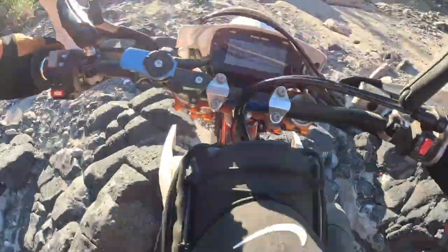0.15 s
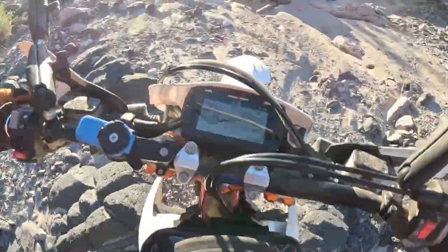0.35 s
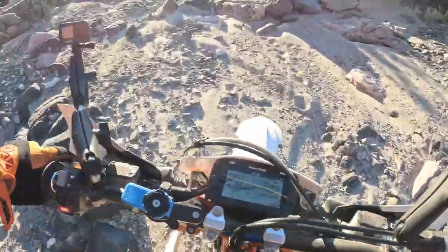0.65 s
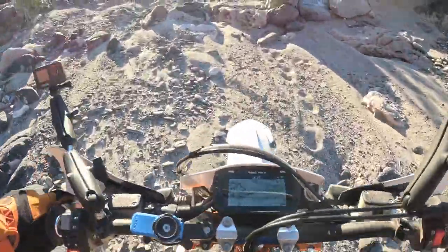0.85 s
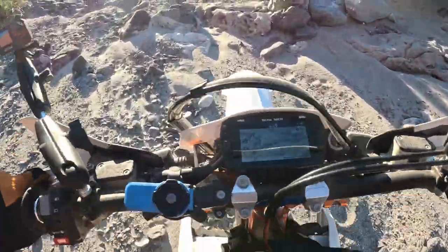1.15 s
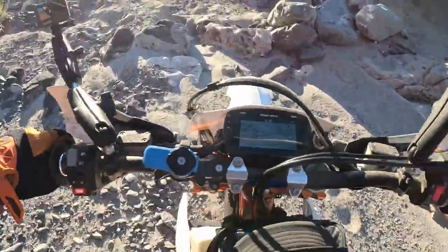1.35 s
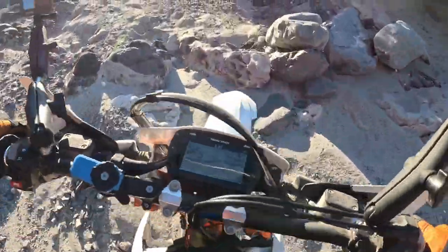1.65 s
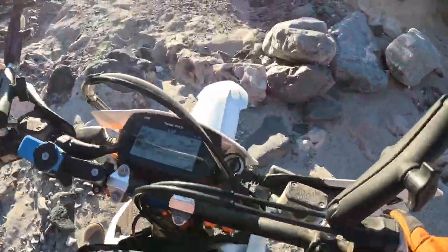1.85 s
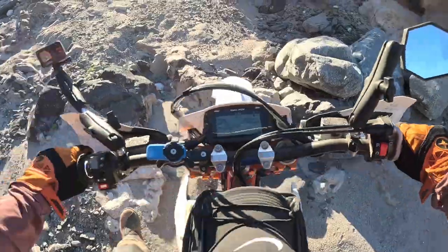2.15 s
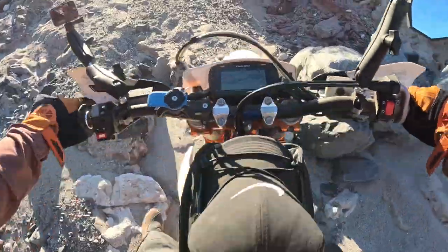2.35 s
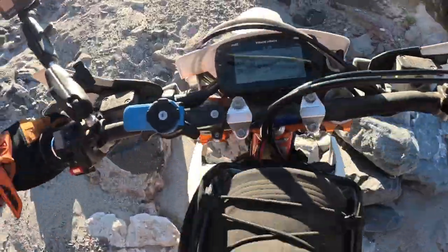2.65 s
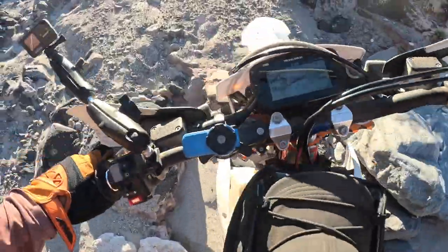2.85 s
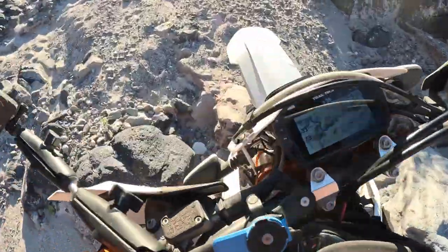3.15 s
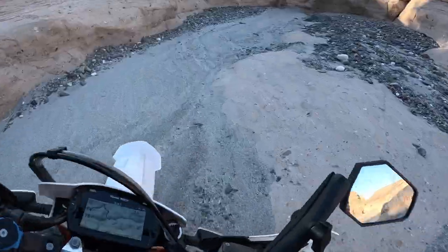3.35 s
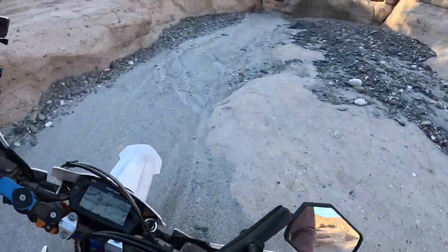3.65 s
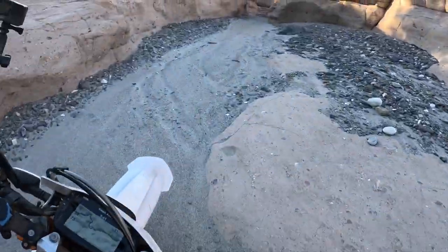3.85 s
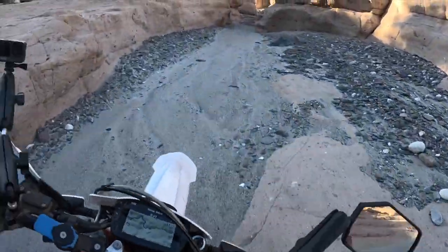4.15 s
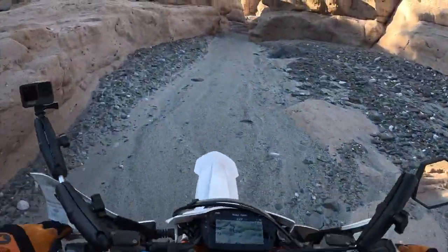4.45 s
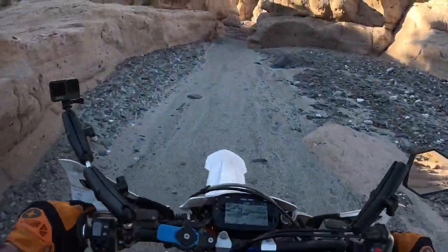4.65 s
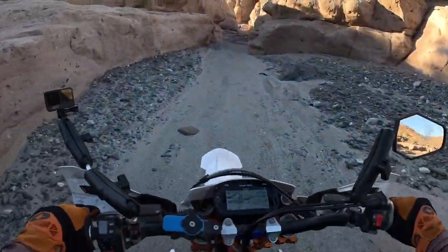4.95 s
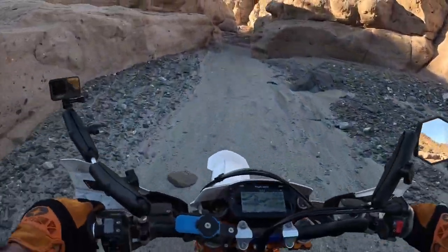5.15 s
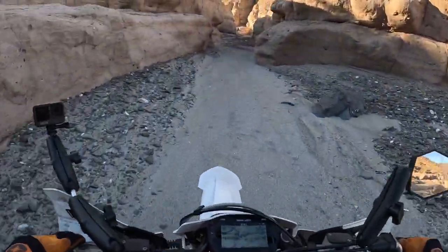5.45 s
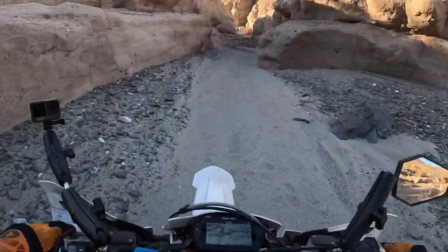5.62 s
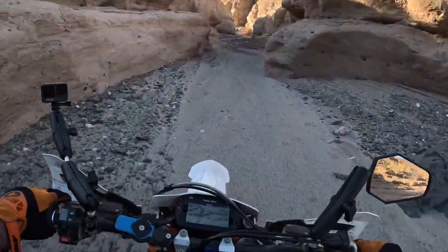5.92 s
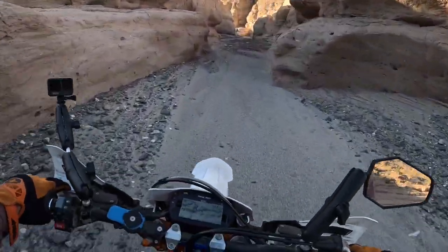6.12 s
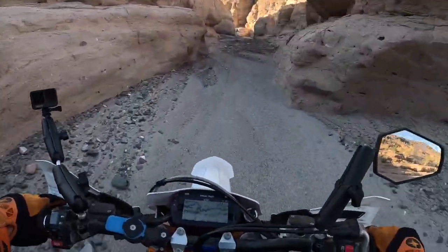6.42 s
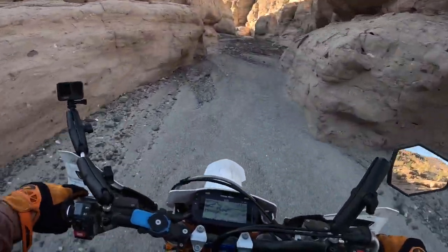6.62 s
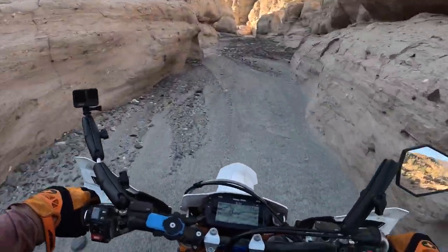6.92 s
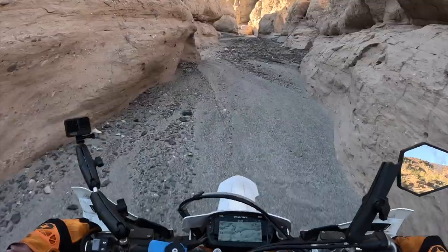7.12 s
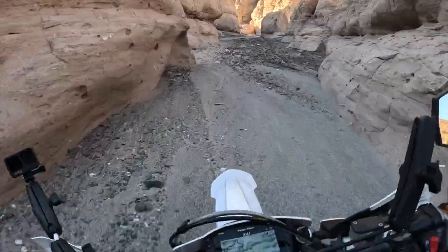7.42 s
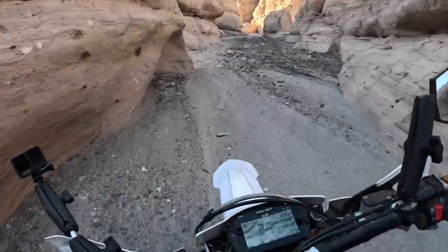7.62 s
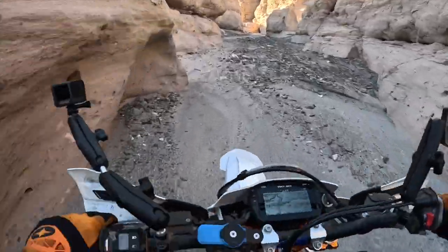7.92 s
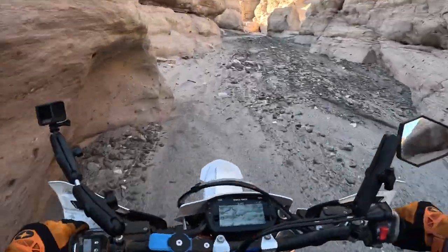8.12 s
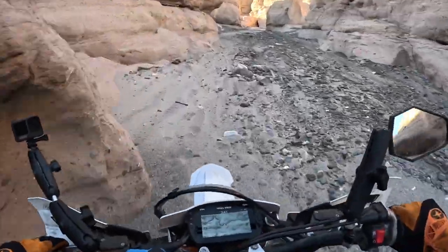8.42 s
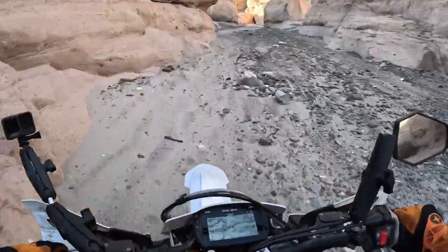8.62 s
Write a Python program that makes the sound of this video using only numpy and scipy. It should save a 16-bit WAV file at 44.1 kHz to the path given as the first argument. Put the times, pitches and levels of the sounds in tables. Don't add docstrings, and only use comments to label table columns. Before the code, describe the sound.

A single-cylinder trail bike chugs unevenly over rocks with chain slaps and stone clicks, then pulls harder and faster along a gravel canyon.

```python
import sys
import numpy as np
from scipy import signal
from scipy.fft import rfft, irfft, next_fast_len
from scipy.io import wavfile
from scipy.ndimage import uniform_filter1d

SR = 44100
rng = np.random.default_rng(int(sys.argv[2]) if len(sys.argv) > 2 else 0)


def how_loud(loudness_db):
    steps = np.asarray(loudness_db, float) / 20
    return 10 ** steps


def unload_audio(sound):
    columns = np.transpose(np.atleast_2d(sound))
    steps = np.round(np.clip(columns, -1, 1) * 32767)
    wavfile.write(sys.argv[1], SR, steps.astype(np.int16))


N = 387198
TIME_S = np.arange(N) / SR


def level(x, db=0):
    return x * how_loud(db) / np.sqrt(np.mean(x ** 2))


def noise():
    return rng.standard_normal(N)


def held(x, seconds):
    return uniform_filter1d(x, int(seconds * SR))


def curve(table, column=1, outside=None):
    columns = np.transpose(table)
    return np.interp(TIME_S, columns[0], columns[column], left=outside, right=outside)


def walk(rate):
    count = N // 50
    return np.interp(TIME_S * rate, np.arange(count), rng.standard_normal(count))


def shaped(x, gain, count=8):
    size = next_fast_len(N + SR)
    f = np.arange(size // 2 + 1) * SR / size + 1
    response = np.interp(f, f[::count], gain(f[::count]))
    return irfft(rfft(x, size) * response, size)[:N]


def modes(table):
    def response(f):
        total = 0
        for k, (hz, width_hz, db) in enumerate(table):
            detune = (f / hz - hz / f) * hz / width_hz
            total = total + (-1) ** k * how_loud(db) / (1 + 1j * detune)
        return total
    return response


def outline(table):
    hz, db = np.transpose(table)
    return lambda f: how_loud(np.interp(np.log(f), np.log(hz), db))


def strikes(turns, place, size):
    at = np.interp(np.arange(-1, 260) + place, turns, np.arange(N), -1, -1)
    keep = at >= 0
    whole = at[keep].astype(int)
    late = at[keep] - whole
    size = size[:len(at)][keep]
    out = np.zeros(N + 1)
    out[whole] = size * (1 - late)
    out[whole + 1] = size * late
    return out[:N]


def noise_bursts(starts, decay_s):
    return noise() * signal.lfilter([1], [1, -np.exp(-1 / (decay_s * SR))], starts)


# start_s, firing_rate_hz
ROCKS = [(0, 25.0), (.25, 24.9), (.4, 23.87), (.59, 21.92), (.79, 25.88), (.99, 17.17), (1.19, 16.43),
         (1.39, 14.61), (1.58, 13.79), (1.78, 13.85), (1.98, 12.63), (2.18, 17.35), (2.38, 24.87),
         (2.58, 27.13), (2.77, 17.05), (2.97, 14.71), (3.17, 10.34)]
# start_s, firing_rate_hz
CANYON = [(3.17, 26.88), (3.32, 29.48), (3.47, 29.42), (3.62, 33.52), (3.78, 32.99), (3.93, 32.16),
          (4.08, 33.74), (4.23, 34.79), (4.38, 28.7), (4.53, 25.0), (4.69, 27.4), (4.84, 26.83),
          (4.99, 29.35), (5.14, 29.54), (5.29, 31.12), (5.44, 32.63), (5.6, 34.55), (5.75, 34.14),
          (5.9, 31.92), (6.05, 29.38), (6.2, 28.72), (6.35, 29.47), (6.51, 29.27), (6.66, 28.97),
          (6.81, 30.43), (6.96, 25.94), (7.11, 24.29), (7.26, 26.38), (7.42, 31.1), (7.57, 34.56),
          (7.72, 32.07), (7.87, 29.43), (8.02, 29.16), (8.17, 26.41), (8.33, 22.78), (8.48, 26.38),
          (8.63, 25.82), (8.78, 25.69)]


def speed():
    flywheel_s, join_s = .08, .015
    join = int(CANYON[0][0] * SR)
    rocks = held(held(curve(ROCKS)[:join], flywheel_s), flywheel_s)
    canyon = held(held(curve(CANYON)[join:], flywheel_s), flywheel_s)
    return held(np.concatenate([rocks, canyon]), join_s)


# open_s, shut_s, opening_level_db, closing_level_db
TWISTS = [(0, 0.338, -20.5, -21), (0.354, 0.6, -28.5, -25.5), (0.602, 0.843, -22.5, -18.5),
          (1.07, 1.18, -26.5, -32), (1.224, 1.438, -20.5, -27.5), (1.524, 2.024, -27.5, -27.5),
          (2.059, 2.149, -15, -14.5), (2.278, 2.537, -23.5, -11.5), (2.547, 2.688, -12.5, -28.5),
          (2.827, 3.043, -27, -24), (3.13, 3.224, -40, -23), (3.235, 4.438, -13, -14.5),
          (4.435, 4.666, -19, -15), (4.659, 5.7, -15, -12.5), (5.704, 6.001, -12.5, -17),
          (6.004, 6.834, -16, -16), (6.905, 6.973, -37, -22), (7.08, 7.311, -32, -15),
          (7.329, 7.898, -10.5, -17), (7.905, 8.084, -17.5, -15.5), (8.082, 8.153, -29, -36),
          (8.283, 8.543, -29.5, -19), (8.576, 8.76, -21, -20)]


def throttle():
    shut_db, wrist_s = -33, .048
    opened = np.zeros(N)
    for open_s, shut_s, first_db, last_db in TWISTS:
        twist = how_loud(np.interp(TIME_S, [open_s, shut_s], [first_db, last_db]))
        opened += (TIME_S >= open_s) * (TIME_S < shut_s) * twist
    return 20 * np.log10(np.maximum(held(opened, wrist_s), how_loud(shut_db)))


# start_s, turbulence_db, upper_ring_db, low_thump_db, crank_shaking_db
SHELTER = [(0, 2.5, -3, -8, 0.8), (.5, 0.5, 12, -12, -3.5), (.9, 0, -2, -5, .1), (1.2, 1, -2, 9.5, 0.5),
           (2.051, 2, -1, 9, 2), (2.25, 10, 8, -5.5, 2), (2.6, 3, 6.5, -7, 2.5), (2.9, -2, -6, 0, 0.5),
           (3.2, 0.5, 5, -2, -1.5), (3.7, 6, -0.5, -9, 3), (4.2, 1.5, 1.5, -10, 3.5),
           (4.5, 4, -4, -14.5, -1.5), (5.0, -1, -4, -23, 2.5), (5.6, -3.5, -3, -11.5, .1),
           (6.2, 0.5, 1, -11.5, -1), (6.8, 0, -4, -15, -4), (7.05, 3.5, 1, -10, -1.5),
           (7.3, 7.5, -7, -12, 0), (7.5, 1, -2, -18, -4), (8.1, -1, 2, -16.5, -2.5),
           (8.4, 1, -2, -15.5, -1.5), (8.78, 1.5, -9, -4.5, 5)]


def shelter(column):
    return how_loud(curve(SHELTER, column))


# after_firing_mark_ms, pitch_hz, swell_ms, choke_ms, level_db, sign (ratio)
AIRBOX = [
    (0.88, 274, 6.4, 3.46, 1, 1),
    (-12.5, 302, 2.5, 5.4, -16, 0.9),
    (13.5, 245, 3, 4.25, -15.5, 1),
    (-4.5, 555, 4.7, 5.3, -17, 0.88),
    (-1, 352.6, 17, 17, -23, 0.93),
    (-2.5, 446, 7.8, 5.3, -23.5, 0.88),
    (-3, 206.8, 8.8, 4.7, -16.5, 0.87),
    (-5.5, 609, 3.3, 4.4, -22, 0.96),
]
# start_s, low_ring_db, middle_ring_db, high_rings_db, after_ring_db
LEAN = [(0, 0, 0, 2.5, -14), (.9, -8, -3, 3.5, 0.1), (2.1, 2, 1, 5, 0.5), (2.5, 3, 7, 3, -9),
        (3.2, -3, -3, 2, 8.5), (3.55, 5, 0.5, 0, -10), (3.75, -10, -4, 3.5, -2.5), (4.25, -4, -6.5, 2.5, 4),
        (4.6, 7, 1, 2, 7), (5.0, 8.5, 4.5, 1.5, -3.5), (5.3, 0.5, 1.5, -2, 3), (5.7, 0, -2.5, 2, 11),
        (6.0, 7, 3, 2, -4), (6.5, 1.5, 4, 2.5, 9), (6.85, 3, 5, 3, 6), (7.35, -2.5, -8, 4.5, -13),
        (7.8, 2, 1, -12, 0.5), (8.4, -10, -2, 4, 11)]
LEAN_RINGS = [
    [6],
    [5],
    [3, 7],
    [2],
]


def airbox(turns, hz, db):
    ms = np.arange(-1800, 1801) * 1000 / SR
    rings = []
    for at_ms, pitch_hz, swell_ms, choke_ms, ring_db, sign in AIRBOX:
        past = ms - at_ms
        swell = np.exp(-.5 * (past / np.where(past < 0, swell_ms, choke_ms)) ** 2)
        rings.append(sign * how_loud(ring_db) * np.cos(2 * np.pi * pitch_hz * past / 1000) * swell)
    beats = strikes(turns, 0, how_loud(.35 * rng.standard_normal(300)))
    beats = beats * how_loud(db) * np.sqrt(SR / hz / np.sum(sum(rings) ** 2))
    gulps = signal.fftconvolve(beats, sum(rings), "same")
    pull = how_loud(.35 * np.clip(np.gradient(hz) * SR, -20, 14) + 1.5 * walk(5))
    gulps += signal.fftconvolve(beats * (pull - 1), rings[2], "same")
    for column, which in enumerate(LEAN_RINGS, 1):
        change = how_loud(curve(LEAN, column)) - 1
        gulps += signal.oaconvolve(beats * change, sum(rings[k] for k in which), "same")
    gulps += signal.oaconvolve(beats * (shelter(2) - 1), rings[4], "same")
    column_modes = modes([(207.0, 168, -.82), (308.0, 126.0, 1.8)])
    rough = level(shaped(noise(), lambda f: column_modes(f) ** 2), -32)
    stroke_turns, stroke_width, stroke_db, stroke_hz = .2, .16, 9, 9.3
    before = (turns + stroke_turns + .5) % 1 - .5
    stroke = how_loud(stroke_db) * (stroke_hz / hz) ** 2 * np.exp(-.5 * (before / stroke_width) ** 2)
    stroke += np.minimum(hz / 25, 1)
    return gulps + rough * stroke * shelter(1) * how_loud(-.15 * (db + 25) + 3 * walk(20))


# pitch_hz, width_hz, level_db
EXHAUST = [
    (57.4, 50, -26),
    (114.6, 12, 9),
    (153, 35, 1.5),
]
CRANK_DB = [
    -10.5,
    -16.5,
    -2.5,
    -15.5,
    -16,
]


def exhaust(turns, hz):
    firings = strikes(turns, .639, how_loud(.4 * rng.standard_normal(300)))
    thump = shaped(firings, lambda f: modes([(82, 45, 0)])(f) ** 2)
    thump = level(thump, -10.5) * shelter(3)
    thud = shaped(firings, lambda f: modes(EXHAUST)(f) / (1 + (f / 260) ** 4))
    shake = np.zeros(N)
    for k, db in enumerate(CRANK_DB, 2):
        shake += how_loud(db + .8 * walk(7)) * np.sin(2 * np.pi * k * turns + k)
    shake *= (hz / 29) ** 2 * shelter(4)
    rumble = shaped(noise(), lambda f: modes(EXHAUST)(f) / (1 + (f / 220) ** 4))
    return level(level(thud) + shake + level(rumble, -14) + thump)


# place (cycle 0-1), rise (cycles), fall (cycles), level_db over the steady rattle
KNOCKS = [
    (.33, .015, .06, -1),
    (.44, .025, .1, 3),
    (.58, .02, .05, -2),
    (.8, .02, .05, -2),
    (.07, .015, .03, -5),
]


def knocking(turns, hz, scatter_db, depth_db=0.):
    out = np.ones(N)
    for place, rise, fall, db in KNOCKS:
        cycle = np.floor(turns - place + .5)
        past = turns - place - cycle
        size = how_loud(db + depth_db + scatter_db * rng.standard_normal(300))[cycle.astype(int)]
        knock = np.exp(-.5 * (past / np.where(past < 0, rise, fall)) ** 2)
        out += size * (25 / hz) ** .57 * knock
    return out


# pitch_hz, width_hz, level_db
CASES = [(425, 55, -6), (544.8, 33.7, 2.5), (674, 58, -1.5), (742, 62, -1), (873, 119, -2.5)]


def cases(turns, hz):
    drive = noise() * knocking(turns, hz, 3.0, -2)
    return level(shaped(drive, lambda f: modes(CASES)(f) / (1 + (400 / f) ** 10) / (1 + (f / 930) ** 12)))


# pitch_hz, density_db (dB per Hz)
METAL = [(590, -44.5), (1000, -11), (1190, -7.5), (2040, -10), (2310, -7.5), (3500, -14.5), (4510, -15),
         (5180, -15.5), (8000, -25.5), (10400, -37), (17600, -120)]
# pitch_hz, level_db
TOP = [(8000, 4.5), (8700, -3.5), (9050, -8.5), (9600, -0.5), (11300, -6.5), (12300, -15.5), (15200, -23.5)]
# pitch_hz, width_hz, level_db
COVERS = [(1270, 80, -5), (1540, 100, -5), (1790, 130, -4), (2090, 110, -3), (2570, 80, -3),
          (2980, 120, -6), (3450, 200, -7), (4100, 400, -11)]


def clatter(turns, hz):
    metal, top = outline(METAL), outline(TOP)
    bright = lambda f: metal(np.minimum(f, 8000)) * top(f)
    broad = noise() * knocking(turns, hz, 3.0, -14) * how_loud(1.2 * walk(12))
    broad = shaped(broad, lambda f: bright(f) / (1 + (950 / f) ** 8) / (1 + (f / 10500) ** 3))
    taps = np.zeros(N)
    for place, _, _, db in KNOCKS:
        taps += strikes(turns + .0052 * walk(30), place, how_loud(db + 7.5 * rng.standard_normal(300)))
    covers = level(noise() * knocking(turns, hz, .8, .3)) + level(taps, -11)
    covers = shaped(covers, lambda f: modes(COVERS)(f) / (1 + (f / 4500) ** 6) / (1 + (1100 / f) ** 8))
    flicks = (rng.random(N) < 300 / SR) * how_loud(3.0 * noise())
    flicks *= (25 / hz) ** 1.5 * knocking(turns, hz, 4.0, -5)
    flicks *= how_loud(-9 * ((TIME_S > 3.17) & (TIME_S < 6.6)))
    grit = shaped(noise_bursts(flicks, .0014), lambda f: bright(f) / (1 + (4200 / f) ** 4))
    seat = strikes(turns, 0, how_loud(2 * rng.standard_normal(300))) * ((TIME_S > 1.2) & (TIME_S < 3.14))
    shield = shaped(noise_bursts(seat, .009), lambda f: bright(f) / (1 + (7000 / f) ** 6))
    return level(level(broad) + level(covers, -.8) + level(grit, -24) + level(shield, -28))


# order (contacts per cycle), level_db
GEAR_ORDERS = [(63.2, 6), (60.2, 3), (57.5, -5), (66.5, -3), (88.5, -5), (106, -6)]
# place (cycle 0-1), speed_change (share of mean), load_db
SURGE = [
    (0, -.005, -1),
    (.2, -.03, -3),
    (.36, -.07, -2),
    (.42, -.05, 2),
    (.52, .02, 2.5),
    (.62, .05, 1),
    (.78, .03, -1.5),
    (1, -.005, -1),
]
# start_s, level_db
CLUTCH = [(0, 4.5), (.33, 5.5), (.42, 3), (.9, 1), (2.1, 0), (2.3, 2), (2.7, 2.5), (3.6, -7), (4.1, 1),
          (4.58, -4), (4.8, -8.5), (5.1, -6), (5.3, -2), (5.9, 0), (6.1, -4.5), (6.8, 4.5), (6.95, -19),
          (7.15, -1), (7.28, 2.5), (7.9, 4), (8.2, -25), (8.5, 7)]


def gears(turns, hz):
    place, speed_share, load_db = np.transpose(SURGE)
    swing = np.interp(turns % 1, place, speed_share) * (25 / hz) ** .9
    crank = np.cumsum(hz * (1 + swing + .004 * walk(3))) / SR
    teeth = np.zeros(N)
    for order, db in GEAR_ORDERS:
        teeth += how_loud(db + 2.5 * walk(120)) * np.sin(2 * np.pi * (order * crank + .1 * walk(200)))
    load = how_loud(np.interp(turns % 1, place, load_db) + 1.5 * walk(25))
    radiate = lambda f: (1.2 + 1.2 * np.abs(modes(COVERS)(f))) / (1 + (1150 / f) ** 8)
    return shaped(level(teeth * load), radiate) * how_loud(curve(CLUTCH))


def strained_part(turns, hz, notes, strength, low_hz):
    drive = noise() * knocking(turns, hz, 2.0, -3)
    ring = shaped(drive, lambda f: modes(notes)(f) / (1 + (low_hz / f) ** 10) / (1 + (f / 3800) ** 10))
    return level(ring) * how_loud(curve(strength, outside=-90))


# pitch_hz, width_hz, level_db
SINGING = [
    (2085, 26, 0),
    (3430, 110, -8),
    (2930, 90, -11),
]
# start_s, level_db
SING = [(3.5, -55), (3.85, -41), (4.2, -43), (4.35, -54), (4.55, -43), (4.9, -45), (5.12, -43), (5.2, -36),
        (5.36, -36), (5.5, -38), (5.9, -38), (6.1, -45), (6.8, -52)]


def clutch_cover(turns, hz):
    return strained_part(turns, hz, SINGING, SING, 1500)


# pitch_hz, width_hz, level_db
LOW_SINGING = [(1526, 60, -1.5), (1270, 70, -8), (1780, 70, -6.5), (2560, 70, -7), (2980, 90, -8.5),
               (3410, 120, -8.5)]
# start_s, level_db
LOW_SING = [(0, -38), (.33, -35), (.42, -44), (.58, -48), (.66, -41), (.85, -46), (1.0, -57), (2.12, -52),
            (2.24, -34), (2.45, -37), (2.68, -43), (2.8, -55)]


def low_covers(turns, hz):
    return strained_part(turns, hz, LOW_SINGING, LOW_SING, 1150)


# start_s, level_db
TANK_SHAKE = [(.4, -52), (.6, -38.5), (1.3, -39.5), (1.9, -40), (2.3, -36), (2.7, -52), (6.9, -50),
              (7.1, -36), (7.3, -31.5), (7.55, -38), (7.7, -45), (8.05, -38), (8.2, -50), (8.42, -33),
              (8.6, -45)]


def tank(turns, hz):
    return strained_part(turns, hz, [(540, 22, 0)], TANK_SHAKE, 450)


# start_s, level_db
GUARD_SHAKE = [(4.6, -50), (5.2, -43), (6.2, -43), (6.8, -39), (6.95, -36), (7.25, -36), (7.4, -51),
               (7.9, -40), (8.2, -38.5), (8.48, -33), (8.65, -35), (8.78, -40)]


def guard(turns, hz):
    return strained_part(turns, hz, [(805, 45, 0), (693, 40, -5.5)], GUARD_SHAKE, 600)


# start_s, peak_db, pitch_hz, ringing_share (0-1)
STONES = [(1.233, -19, 2570, 0.44), (1.4112, -18, 2650, 0.45), (1.471, -32, 2650, 0.6),
          (1.847, -10, 2530, 0.34), (2.0359, -15, 2590, 0.78), (2.096, -22, 2870, 0.5),
          (2.315, -20.5, 2480, 0.5), (3.0594, -33, 2580, 0.2), (4.563, -19.5, 3500, 0.5),
          (5.3, -29, 3020, 0.45), (5.5763, -30, 2880, 0.4), (7.3885, -13, 3710, 0.56),
          (3.6737, -18.5, 4850, 0.61), (0.0422, -21, 3260, 0.27), (0.3896, -26, 2600, 0.43),
               (0.436, -20, 2700, 0.54), (.7577, -25, 3000, .3), (0.78, -20, 3280, .3),
               (2.2687, -21, 4160, .4), (7.1292, -22, 4500, .3), (7.3498, -13, 2040, 0.63),
               (7.4233, -25, 3400, .4), (7.511, -25, 2320, .4), (1.2107, -24, 2640, .4)]
# start_s, peak_db, pitch_hz, ringing_share (0-1)
RINGING_STONES = [(0.478, -17, 1990, 1), (0.6257, -15, 2220, 1), (0.6696, -17, 1920, 1), (0.7943, -19, 2590, 0.9),
                  (0.871, -19, 2090, 0.9), (1.0577, -21, 1310, 0.9), (1.1794, -20, 1510, 0.9),
                  (1.2338, -16, 1690, 0.9), (1.3765, -18, 2260, 1), (1.5142, -18, 1870, 0.9),
                  (1.8464, -18, 2720, 0.9), (2.028, -16, 2540, 0.9), (2.0959, -19, 2730, 0.8),
                  (2.1492, -21, 1790, 0.9), (2.2151, -20, 1760, 0.9), (2.3383, -16, 1460, 0.8),
                  (2.394, -18, 1540, 0.9), (2.4355, -18, 1620, 0.9), (2.477, -16, 1670, 0.8),
                  (2.5128, -16, 1820, 0.9), (2.5543, -19, 1800, 0.9), (2.5905, -19, 1670, 0.9),
                  (3.1106, -21, 1740, 0.9), (3.1824, -19.5, 1900, 0.9)]
# start_s, peak_db, pitch_hz, ringing_share (0-1)
CANYON_STONES = [
    (4.52, -23, 2150, 0.99),
    (4.525, -25, 1740, .9),
    (4.56, -21, 1770, .9),
    (4.6, -24, 2150, 1),
]


def stones():
    crack_ms, ring_ms, rise_s, ringing_db = 2.8, 5.0, .0003, -4.5
    out, t = np.zeros(N + 2000), np.arange(2000) / SR
    ringing = [(s, db + ringing_db, hz, share) for s, db, hz, share in RINGING_STONES]
    for s, db, hz, share in STONES + CANYON_STONES + ringing:
        crack = (1 - share) * .98 * rng.standard_normal(2000) * np.exp(-1000 * t / crack_ms)
        pair = np.sin(2 * np.pi * hz * t) * np.cos(2 * np.pi * .038 * hz * t)
        ring = share * pair * np.exp(-1000 * t / ring_ms)
        start = int(s * SR)
        out[start:start + 2000] += how_loud(db) * (crack + ring) * np.minimum(t / rise_s, 1)
    return shaped(out[:N], lambda f: outline(TOP)(f) / (1 + (f / 6500) ** 3) / (1 + (900 / f) ** 3))


# start_s, peak_db, sharpness_db
TICKS = [(0.0618, -36.5, -11), (0.185, -30, -10), (0.436, -38.5, -12), (0.7382, -39, -12.5),
         (0.869, -37, -10), (0.9687, -37.5, -10.5), (1.277, -35.5, -12.5), (1.341, -37, -11),
         (1.4102, -32, -12), (1.515, -40, -13.5), (1.6172, -40, -12), (1.8484, -24.5, -10.5),
         (1.9131, -35, -12), (1.9849, -34.5, -13.5), (2.105, -36.5, -11.5), (2.148, -37, -11.5),
         (2.222, -35, -13.5), (2.2662, -38, -12.5), (2.315, -35.5, -14), (2.3994, -35, -13.5),
         (2.439, -32.5, -12), (2.6409, -35, -11.5), (2.7626, -35.5, -11), (2.9312, -34, -13),
         (2.9951, -38.5, -10), (3.0679, -38.5, -11.5)]


def grit_ticks():
    at_s, db, sharp_db = np.transpose(TICKS)
    at = (at_s * SR).astype(int)
    dull, sharp = np.zeros((2, N))
    dull[at] = how_loud(db - 3)
    sharp[at] = how_loud(db + sharp_db - 10)
    dull, sharp = noise_bursts(dull, .003), noise_bursts(sharp, .003)
    dull = shaped(dull, lambda f: outline(TOP)(f) / (1 + (3800 / f) ** 4) / (1 + (f / 7500) ** 3))
    return dull + shaped(sharp, lambda f: 1 / (1 + (10500 / f) ** 10))


# start_s, level_db
DUST = [(0, -63), (.8, -61), (1.0, -70), (2.0, -64), (2.6, -59), (3.1, -60.5), (3.3, -67.5), (4.25, -62.5),
        (4.5, -75.5), (6.7, -75.5), (6.85, -61.5), (7.1, -67), (7.3, -54.5), (7.5, -64), (7.8, -61.5),
        (8.2, -67), (8.6, -60)]


def dust(turns, hz):
    centre_hz = 6500
    hiss = noise() * knocking(turns + .4, hz, 3.0, -4) * how_loud(2 * walk(8))
    band = lambda f: outline(TOP)(f) / (1 + (centre_hz / f) ** 5) / (1 + (f / centre_hz) ** 2)
    return level(shaped(hiss, band)) * how_loud(curve(DUST))


def rock_walls(bike):
    t60_s, wall_db, first_s = .2, -27, .012
    lag = TIME_S[:SR // 3]
    walls = rng.standard_normal(len(lag)) * how_loud(-60 * lag / t60_s) * (lag > first_s)
    walls /= np.sqrt(np.sum(walls ** 2))
    return how_loud(wall_db) * signal.fftconvolve(bike, walls)[:N]


# start_s, level_db
GROUND = [(0, 0.5), (.85, 6), (1.05, -1.5), (1.25, 0), (2.05, -2), (2.3, 2.5), (2.65, 4.5), (2.85, -7),
          (3.2, -2), (4.0, -4), (4.35, -1), (4.9, -0.5), (5.5, -1), (6.8, 6), (7.12, 4.5), (7.28, 9.5),
          (8.3, 7.5), (8.6, 12.5)]


def scene():
    hz = speed()
    turns = -.1 + np.cumsum(hz) / SR
    intake_db = throttle()
    octaves = np.log2(hz / 25)
    effort = held(intake_db, .25) + 20
    shaking = curve(GROUND)
    change = held(np.minimum(np.abs(np.gradient(hz)) * SR, 30), .05)

    def balance(db, per_octave, per_effort_db, per_shaking_db, per_hz_s):
        slopes = per_octave * octaves + per_effort_db * effort + per_shaking_db * shaking
        return how_loud(db + slopes + per_hz_s * change)

    bike = airbox(turns, hz, intake_db)
    bike += balance(-39.5, 2, .09, .44, .1514) * exhaust(turns, hz)
    bike += balance(-34.5, -1, -.04, .54, .019) * cases(turns, hz)
    bike += balance(-33.5, -.8, .17, .5, .033) * clatter(turns, hz)
    bike += balance(-40, -11, .59, -.28, .0886) * gears(turns, hz)
    bike += clutch_cover(turns, hz) + low_covers(turns, hz)
    bike += tank(turns, hz) + guard(turns, hz)
    bike += stones() + grit_ticks() + dust(turns, hz)
    return (bike + rock_walls(bike))[None]


def housing(f):
    peak_hz, peak_width_hz, dip_hz, dip_width_hz = 330, 15, 339, 8
    dip = dip_hz ** 2 - f ** 2 + 1j * f * dip_width_hz
    return dip / (peak_hz ** 2 - f ** 2 + 1j * f * peak_width_hz)


def low_pass(x):
    return signal.sosfilt(signal.butter(12, 15140, fs=SR, output="sos"), x)


def record(dry):
    wind_filter = signal.butter(5, 58, "high", fs=SR, output="sos")
    cut = signal.sosfilt(wind_filter, shaped(dry[0], housing)[None])
    buffet = level(shaped(noise(), lambda f: 1 / (1 + (f / 40) ** 4)), -65)
    mix = 1.449 * np.tanh((cut + buffet) / 1.51)
    return low_pass(mix)


dry = scene()
out = record(dry)
unload_audio(out)
```